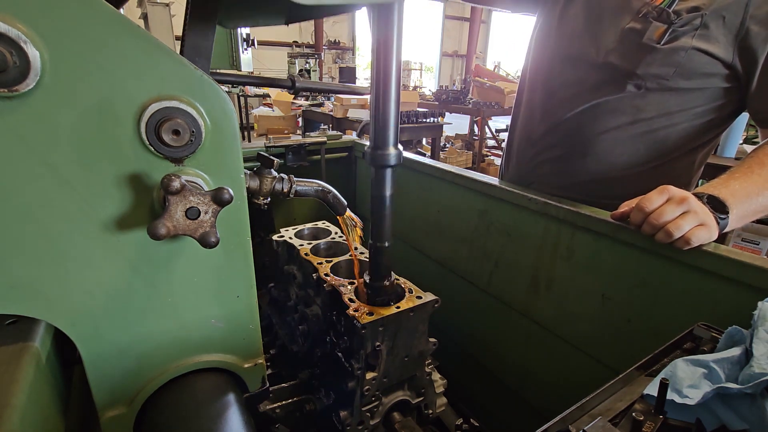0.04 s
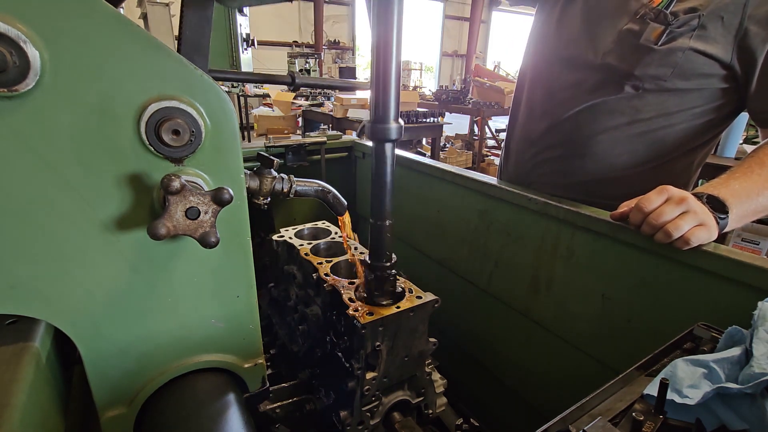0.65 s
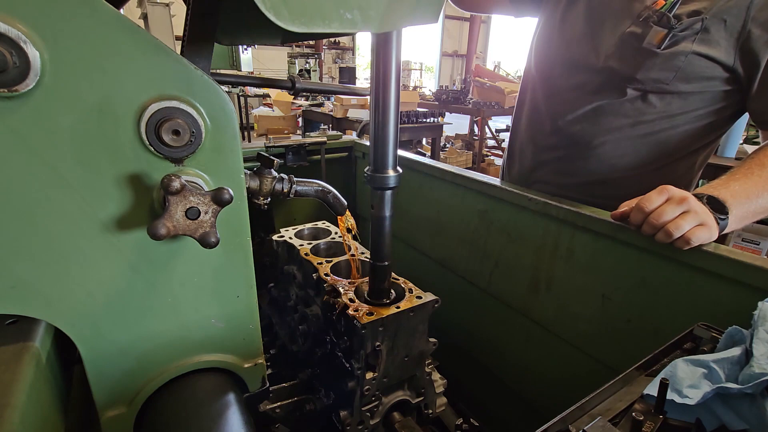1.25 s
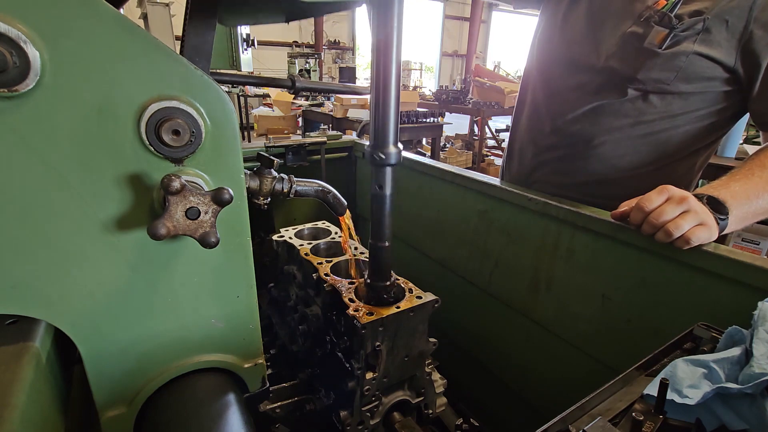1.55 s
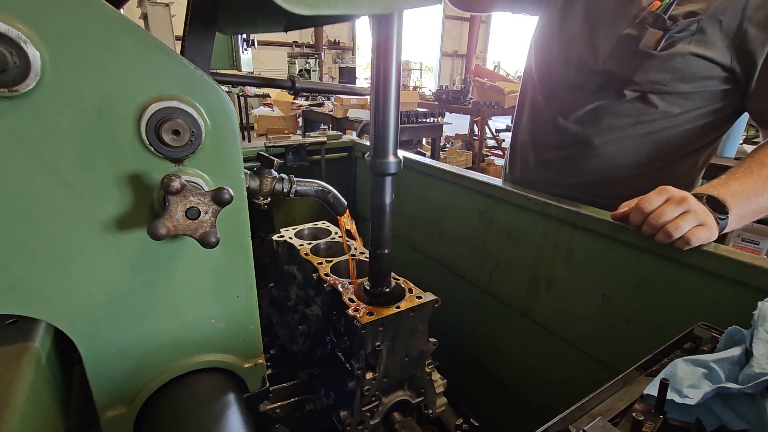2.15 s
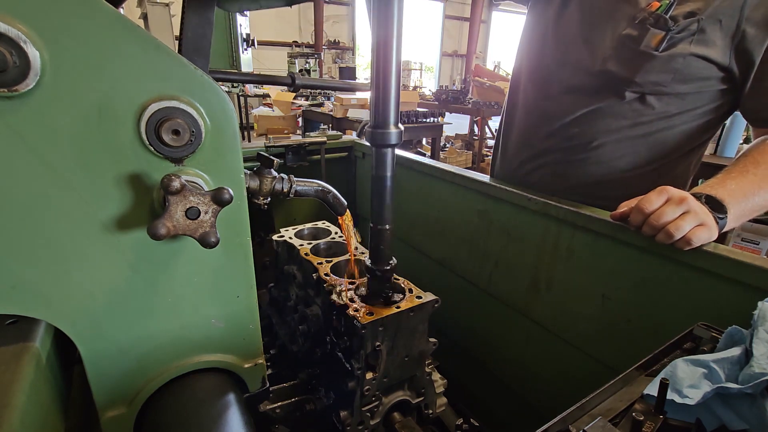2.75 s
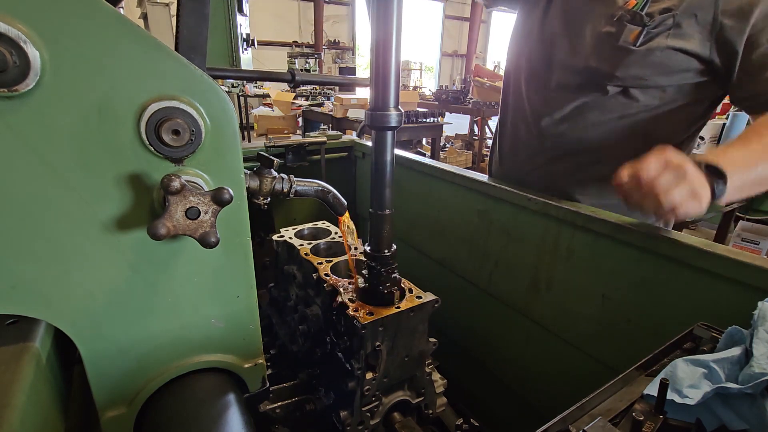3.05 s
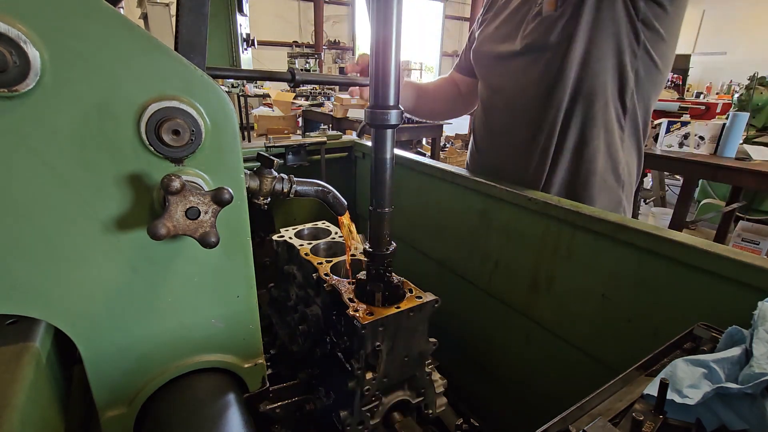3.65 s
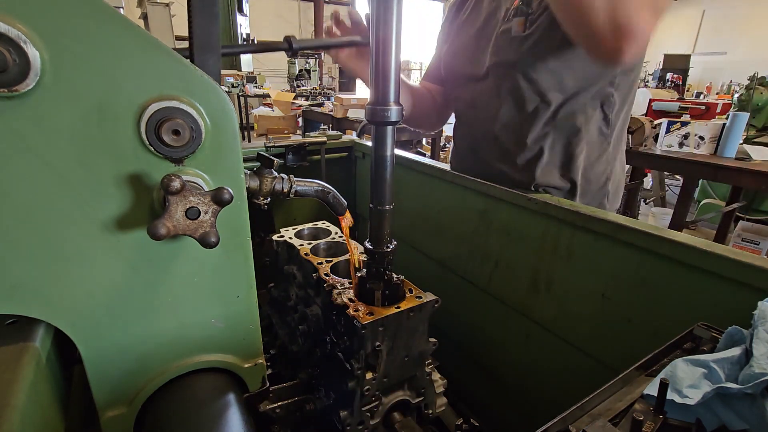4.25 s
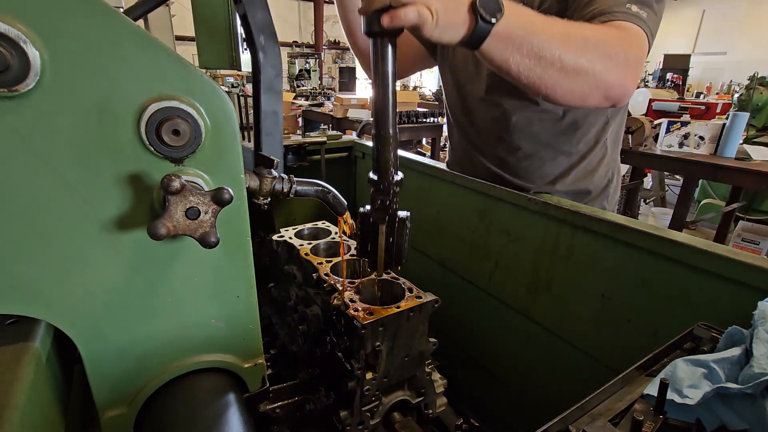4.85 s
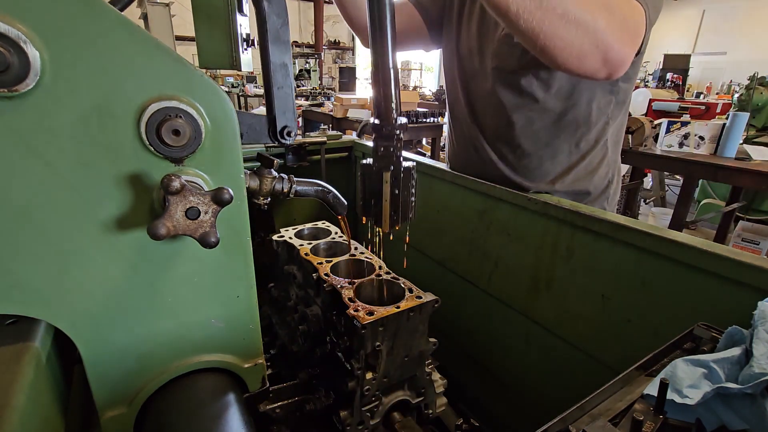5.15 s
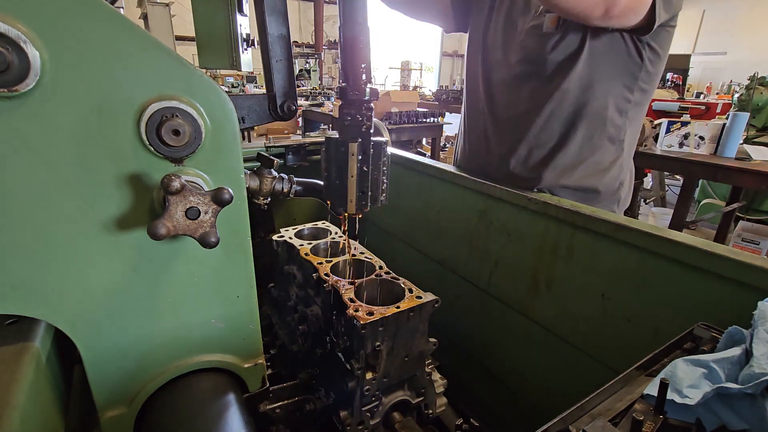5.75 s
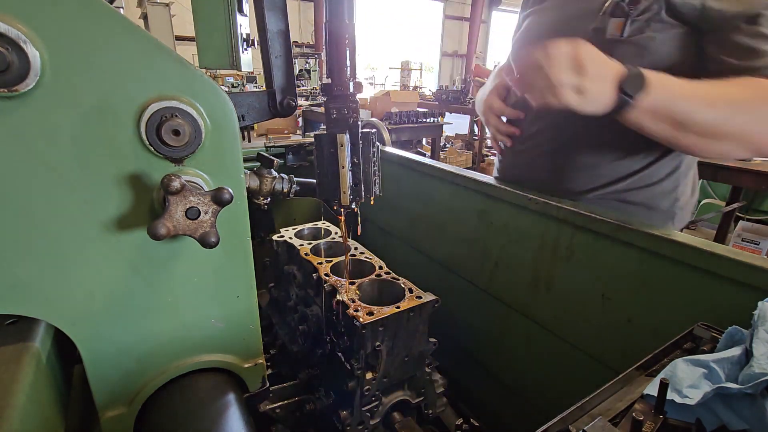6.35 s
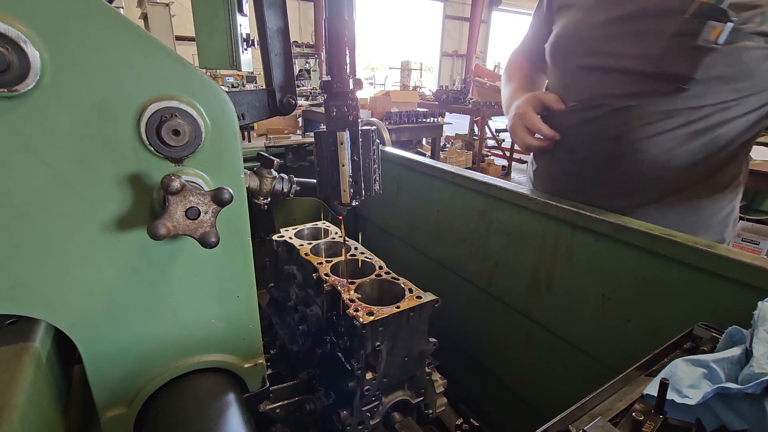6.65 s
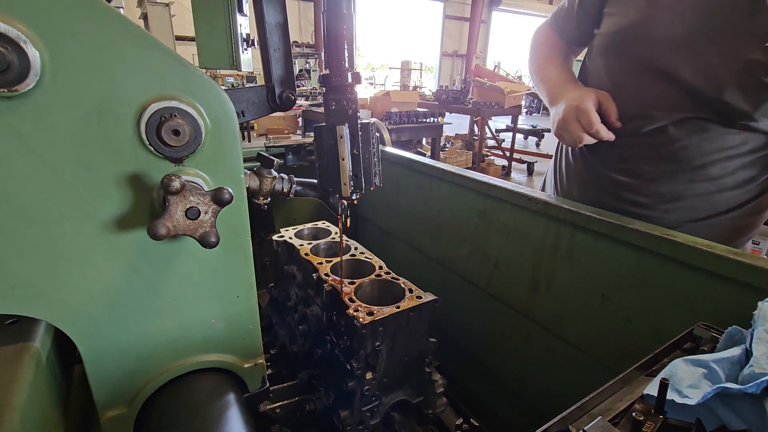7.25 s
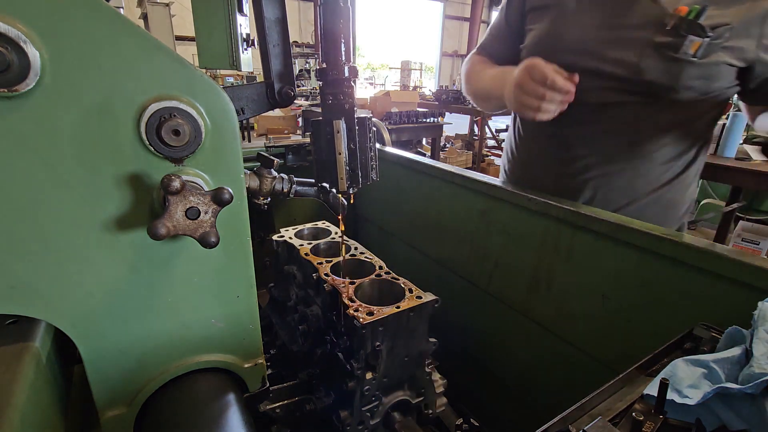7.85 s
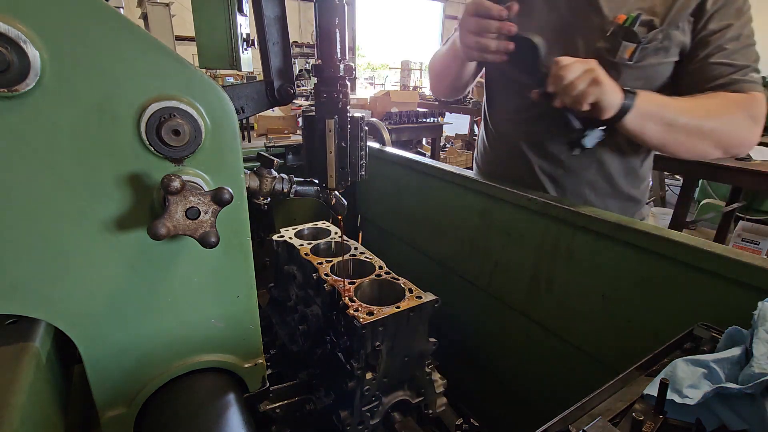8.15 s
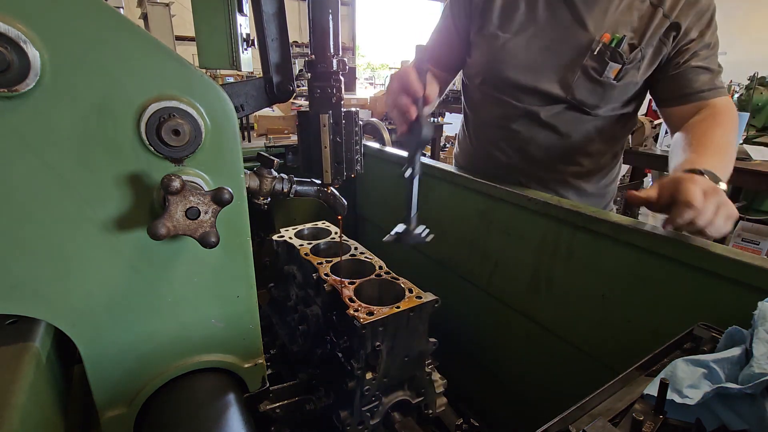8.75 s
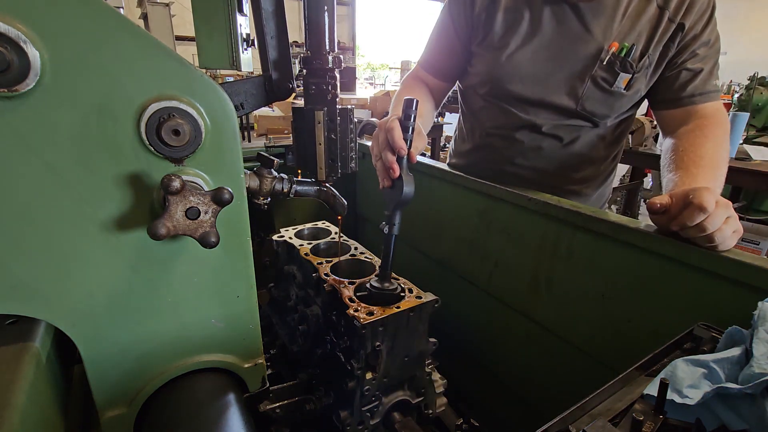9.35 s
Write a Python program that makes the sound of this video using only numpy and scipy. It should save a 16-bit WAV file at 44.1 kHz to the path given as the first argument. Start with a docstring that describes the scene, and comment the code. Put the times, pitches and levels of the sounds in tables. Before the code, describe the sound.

A honing machine drones and scrapes in an engine bore, stops with a clack and brief squeal, then oil drips faintly.

```python
"""A machine shop, a stereo pair close to a honing machine, the low hum of other machines further off.
Stones scrape through an oiled engine bore over the drone of motor and gears; a feed pawl clicks twice
a stroke. The stones are eased off, the drive is thrown out with a clack and a short brake squeal, and
the head is swung up and latched, thudding through the frame. Then oil drips into the tray and tools
are handled, with a short echo from the shop."""
import sys
import numpy as np
from scipy import signal
from scipy.fft import rfft, irfft, next_fast_len
from scipy.io import wavfile
from scipy.ndimage import uniform_filter1d

SR = 44100
rng = np.random.default_rng(int(sys.argv[2]) if len(sys.argv) > 2 else 0)


def pcm_store(signal):
    """Save signal as 16-bit PCM."""
    levels = np.round(np.clip(np.atleast_2d(signal), -1, 1) * 32767)
    wavfile.write(sys.argv[1], SR, levels.astype(np.int16).T)


N = 422919
T, HZ = np.arange(N) / SR, np.fft.rfftfreq(N, 1 / SR)
AGE = T[:SR // 2]  # seconds since a strike

# stereo width at the microphones: f/Hz, side minus mid/dB
STEREO_WIDTH = [(60, -19), (140, -23), (260, -9.5), (500, -6.5), (1000, -.5), (16000, 1)]
# decay of the shop's echo: f/Hz, t60/s
SHOP_DECAY = [(150, 0.51), (600, 0.37), (2000, 0.29), (6000, 0.35), (15000, 0.21)]
# spectrum of the room air: f/Hz, relative level/dB
AIR_SPECTRUM = [(25, -8), (64, -4.5), (130, -4.5), (235, -11), (400, -15.5), (560, -19), (1060, -29),
                (2000, -35), (4700, -37.5), (8000, -40.5), (10000, -49), (15800, -42)]
# hum of distant machines: f/Hz, width/Hz, level/dB
DISTANT_HUM = [(78, 14, -47.5), (120, 1.5, -47), (138.3, 4, -48.5), (195.8, 7.3, -57)]
# swells of a soft, hollow rush: t/s, length/s, level/dB
RUSH_SWELLS = [(7.9, .55, -50.5), (8.95, 0.8, -58)]
# resonances of that rush: f/Hz, width/Hz, relative level/dB
RUSH_MODES = [(666, 170, -0.5), (3000, 1700, -13.5)]
# large drops of oil: t/s, level/dB, f/Hz
OIL_DROPS = [(5.5065, -48, 3050), (5.6521, -46, 1450), (5.8621, -49, 1700), (5.9249, -47, 3360),
             (6.2354, -45, 4480), (6.891, -45, 1800), (7.089, -47, 1460), (7.1501, -46, 2350),
             (7.442, -47.5, 3340), (7.7453, -44, 1820), (8.264, -43.5, 4660), (8.39, -44, 5450),
             (8.422, -42, 5960), (8.519, -43, 7370), (8.711, -48, 2300), (8.862, -46, 7360),
             (9.263, -45, 5700)]
# clicks of handwheel, levers and tools: t/s, level/dB, f/Hz
METAL_CLICKS = [(3.275, -32, 9000), (3.89, -30.5, 11000), (3.958, -34, 8000), (4.048, -28, 5200),
                (4.146, -29, 8500), (4.388, -27.5, 4900), (4.44, -31.5, 11000), (4.645, -31, 7000),
                (4.803, -33.5, 4500), (4.89, -36.5, 6100), (5.236, -36, 7040), (5.376, -37.5, 8000),
                (6.345, -37, 13000), (6.435, -34, 5840), (6.517, -34.5, 6600), (8.117, -44, 9000),
                (9.478, -35, 6000), (9.533, -36, 6400)]
# ring of a steel tool: f/Hz, relative level/dB, t60/s
TOOL_MODES = [(1911, -9, .1), (4350, -6, .12), (9030, 1, .08), (10000, -5, .1)]
# blows on levers and frame: t/s, level/dB, f/Hz, spread/octaves, t60/s, relative body level/dB
LEVER_BLOWS = [(4.569, -11.3, 6200, 1.5, 0.1, -4.5), (5.207, -29, 2120, 1.14, 0.082, 0),
               (5.2844, -11, 2700, 1.12, 0.049, -4.5), (6.016, -24.5, 424, 0.36, 0.083, -2),
               (6.132, -29.5, 330, 0.56, 0.099, -5), (8.367, -24.5, 330, .7, 0.06, -9)]
# ring of the frame: f/Hz, relative level/dB, t60/s
FRAME_MODES = [(257, 0, 0.5), (378, 4, 0.25), (441, -1, 0.18), (584, -5, 0.14), (708, -6, 0.12),
               (1416, 3.5, 0.13), (3400, -7, 0.16)]
# shoves that set the frame shuddering: t/s, length/s, level/dB
FRAME_SHOVES = [(4.567, .09, -21), (4.737, .06, -30.5), (4.907, 0.074, -33), (5.1, 0.43, -41.5),
                (8.38, .19, -38)]
# hum of motor and gears at full speed: multiple of the shaft rate, level/dB
SHAFT_HARMONICS = [(1, -52), (2, -40), (3, -30), (4, -38), (5, -22), (7, -49), (8, -34.5), (9, -45.5),
                   (10, -34), (11, -57), (12, -45.5), (15, -37.5), (16, -41), (19, -46.5), (20, -49.5),
                   (26, -45), (27, -42.5), (34, -48), (35, -44), (43, -49.5), (45, -49.5)]
# spectrum of the gear train's rattle: f/Hz, relative level/dB
GEAR_SPECTRUM = [(25, -28), (45, -15), (150, -14.5), (190, -13), (290, -13), (400, -20), (640, -19.5),
                 (930, -23), (1770, -28), (3000, -29.5), (7500, -40.5), (9000, -45.5), (15500, -50.5)]
# resonances of the gear case: f/Hz, width/Hz, relative level/dB
CASING_MODES = [(240, 23, -36.5), (800, 39, -41.5), (1027, 71, -44.5), (1254, 76, -47.5), (1474, 51, -45)]
# ring of the pawl: f/Hz, relative level/dB, t60/s
PAWL_MODES = [(3250, -16, .07), (4400, -6, .07), (4490, -2, .08), (4640, 0, .1), (10734, -9, .2)]
# faint singing of the stones: t/s, length/s, f/Hz, level/dB
SINGING_SPELLS = [(0, 2.4, 3250, -45), (.55, 2.2, 3730, -50.5), (2.7, 0.33, 3755, -45.5)]
# spectrum of grit scraping iron: f/Hz, relative level/dB
GRIT_SPECTRUM = [(35, -30), (110, -12.5), (300, -18.5), (420, -17.5), (750, -23.5), (1160, -27),
                 (2300, -30.5), (5200, -29.5), (8000, -33), (9500, -36), (11600, -35.5), (15800, -38.5)]
# bore and hone ringing under the stones: f/Hz, width/Hz, relative level/dB
BORE_MODES = [(81.6, 3.5, -43), (145, 22, -36.5), (175, 4, -54), (189, 3.8, -35), (217.7, 7, -37.5),
              (250, 24, -33.5), (288, 27, -41), (365, 2, -46), (451.5, 11, -43), (4490, 22, -50)]

STROKE_STARTS_S = 0.2086 + 1.02705 * np.arange(3)
LIFT_S = 4.85  # the head leaves the bore


def amp(db):
    """Decibels to amplitude."""
    return 10 ** (np.asarray(db) / 20)


def unit(x):
    """Scales to an rms of 1."""
    return x / np.sqrt(np.mean(x ** 2) + 1e-20)


def curve(points, hz):
    """Values at hz, the points joined by straight lines on a log-frequency axis."""
    f, value = np.transpose(points)
    return np.interp(np.log(hz + 1), np.log(f + 1), value)


def side_gain(hz):
    """Side relative to mid: bass is alike at both microphones, treble diffuse."""
    return amp(curve(STEREO_WIDTH, hz))


def since(s):
    """Seconds gone by since time s; zero before it."""
    return np.maximum(T - s, 0)


def swell(start, length, rise_s, fade_db_per_s):
    """An envelope that rises, holds until start + length, and dies away."""
    return np.minimum(since(start) / rise_s, 1) * amp(-fade_db_per_s * since(start + length))


def add(mix, s, sound, pan_db=0):
    """Lays a sound into the mix at time s; pan_db is left minus right."""
    part = mix[:, max(round(s * SR), 0):][:, :sound.shape[-1]]
    part += (sound * amp([[pan_db / 2], [-pan_db / 2]]))[:, :part.shape[1]]


def drift(hz):
    """A random wander of rms 1, up to about hz."""
    rolloff = np.sqrt(1 + (np.arange(2049) / T[-1] / hz) ** 4)
    slow = irfft(rfft(rng.standard_normal(4096)) / rolloff)
    return np.interp(T, np.linspace(0, T[-1], len(slow)), unit(slow))


def noise(colour):
    """Stereo noise with the given amplitude spectrum and a mid rms of 1."""
    size = next_fast_len(N, True)
    hz = np.fft.rfftfreq(size, 1 / SR)
    z = rng.standard_normal((2, len(hz), 2)).view(complex)[..., 0] * np.interp(hz, HZ, colour)
    mid, side = irfft(z[0], size)[:N], irfft(z[1] * side_gain(hz), size)[:N]
    return np.array([mid + side, mid - side]) / np.std(mid)


def patchy(x, depth_db):
    """Gives x short, random swells of level in scattered bands."""
    z = signal.stft(x, nperseg=256)[2]
    field = uniform_filter1d(rng.standard_normal(z.shape[1:]), 14, axis=1)  # smooth over time
    field = uniform_filter1d(field, 6, axis=0)  # and over frequency
    return signal.istft(z * unit(amp(depth_db * unit(field))), nperseg=256)[1][:, :N]


def resonances(modes):
    """Modes (f/Hz, width/Hz, level/dB) kept ringing by random forces."""
    power = sum(amp(db) ** 2 * unit(1 / (1 + ((HZ - hz) / width) ** 2)) ** 2 for hz, width, db in modes)
    return noise(np.sqrt(power)) * np.sqrt(power.mean())


def ring(modes):
    """Struck modes, reaching the two microphones in different phases; the peak is 1."""
    out = 0
    for hz, db, t60 in modes:
        phase = np.array([[1], [-1]]) * side_gain(hz) * rng.uniform(-1.23, 1)
        out += amp(db - 60 * AGE / t60) * np.sin(2 * np.pi * hz * AGE + phase)
    return out / abs(out).max()


def crack(hz, octaves, t60):
    """The dense, fast-dying modes of a contact, gathered around hz."""
    f = np.fft.rfftfreq(len(AGE), 1 / SR) + 1
    band = 1 / (1 + (np.log2(f / hz) / octaves) ** 2 / 2) ** 2 / np.sqrt(f + hz)
    z = rfft(rng.standard_normal((2, len(AGE)))) * band
    mid, side = irfft(z[0], len(AGE)), irfft(z[1] * side_gain(f), len(AGE))
    envelope = amp(-60 * AGE / t60) * (1 - np.exp(-AGE / 0.00074))
    return 0.64 * np.array([mid + side, mid - side]) / np.std(mid) * envelope


def room(x, tail_db):
    """Adds sparse reflections of the shop, each band dying at its own speed."""
    taps = rng.choice([-1., 1.], (2, SR)) * (rng.random((2, SR)) < .06) * (T[:SR] > .004)
    hz, t, z = signal.stft(taps, SR, nperseg=256)
    tail = signal.istft(z * amp(-60 * t / curve(SHOP_DECAY, hz)[:, None]), SR, nperseg=256)[1]
    return x + amp(tail_db) * signal.oaconvolve(x, tail / np.linalg.norm(tail[0]), axes=1)[:, :N]


def shop(air_db=-44.5, whine_hz=374, whine_db=-56.5):
    """Steady room air, the hum of distant machines, and a soft rush that comes and goes."""
    air = amp(air_db) * noise(amp(curve(AIR_SPECTRUM, HZ)))
    whine = np.sqrt(2) * amp(whine_db) * np.sin(2 * np.pi * whine_hz * T + drift(5))
    rush = sum(amp(db) * swell(s, length, rise_s=.12, fade_db_per_s=70) for s, length, db in RUSH_SWELLS)
    return air + whine + resonances(DISTANT_HUM) + rush * resonances(RUSH_MODES)


def spray(start_s=3.1, rise_s=.42, drain_s=.47, level_db=-50.5, band_specks_per_s=20):
    """Specks of oil tick on the metal as the hone comes up the bore, ever fainter as the head drains."""
    out = np.zeros((2, N))
    for hz in (7300, 11000, 15000):
        specks = (rng.random(N) < band_specks_per_s / SR) * amp(12 * rng.random(N) ** 2)
        out += signal.oaconvolve(specks[None], crack(hz, octaves=.25, t60=.034), axes=1)[:, :N]
    flow = np.minimum(since(start_s) / rise_s, 1) / (1 + since(LIFT_S) / drain_s) ** .85
    return room(amp(level_db) * flow * unit(out), tail_db=-.5)


def drop(hz):
    """A small bubble rings with rising pitch under a soft splat."""
    bubble = np.sin(2 * np.pi * hz * AGE * (1 + .89 * AGE))
    envelope = amp(-60 * AGE / .05) * (1 - np.exp(-AGE / .0012))
    return bubble * envelope + amp(-2) * crack(hz, octaves=.35, t60=.065)


def oil(small_db=-56, scatter_s=.08, bursts=40):
    """Oil drips off the raised head: large drops that splash, and small ones in bursts of four."""
    out = np.zeros((2, N))
    for s, db, hz in OIL_DROPS:
        add(out, s, amp(db) * (drop(hz) + amp(-5) * crack(3600, octaves=.64, t60=.08)))
    for k, burst in enumerate(rng.random((bursts, 4, 4))):
        s = LIFT_S + (k + rng.random()) / bursts * (T[-1] - LIFT_S)
        for lag, size, pitch, place in burst:
            droplet = amp(small_db + 6 * size ** 2) * drop(1700 * 4 ** pitch)
            add(out, s + scatter_s * lag, droplet, pan_db=8 * (place - .5))
    return room(out, tail_db=-1.5)


def handling(clink_s=7.537, clink_db=-37):
    """Metal parts click lightly, and a steel tool clinks once, left of the microphones."""
    out = np.zeros((2, N))
    for s, db, hz in METAL_CLICKS:
        add(out, s, amp(db) * crack(hz, octaves=.68, t60=.088))
    add(out, clink_s, amp(clink_db) * ring(TOOL_MODES), pan_db=9.4)
    return room(out, tail_db=-6.5)


def brake(peak_s=4.74, peak_hz=925, peak_db=-26, grow_db_per_s=125, fade_db_per_s=353):
    """The brake's rough squeal grows, rises a little and breaks off, with a second tone just below."""
    before = np.maximum(peak_s - T, 0)
    hz = (peak_hz - 350 * before) * (1 + .0222 * drift(55))
    angle = 2 * np.pi * np.cumsum(hz) / SR
    squeal = np.array([np.sin(angle + lag) + .35 * np.sin(.91 * angle - lag) for lag in (0, 1)])
    envelope = amp(peak_db - grow_db_per_s * before - fade_db_per_s * since(peak_s))
    return squeal * envelope * (1 + .56 * drift(50))


def frame(thud_db=-5, thud_hz=480, sway_hz=80):
    """Levers strike the frame, which thuds and rings; shoves make it shudder on its lowest modes."""
    out = np.zeros((2, N))
    for s, db, hz, octaves, t60, body_db in LEVER_BLOWS:
        # a soft blow barely excites the high modes
        modes = [(f, level - 10 * np.log10(1 + (f / (2 * hz)) ** 4), decay)
                 for f, level, decay in FRAME_MODES]
        body = .5 * ring(modes) + amp(thud_db) * crack(min(hz, thud_hz), octaves=.87, t60=.19)
        add(out, s, amp(db) * (crack(hz, octaves, t60) + amp(body_db) * body), pan_db=-1)
    shudder = sum(amp(db) * swell(s, length, rise_s=.058, fade_db_per_s=122)
                  for s, length, db in FRAME_SHOVES)
    sway = np.sqrt(2) * np.sin(2 * np.pi * np.cumsum(sway_hz + 5 * drift(10.8)) / SR)
    return room(out, tail_db=-12) + shudder * (sway + resonances([(130, 50, -6.5), (251, 38, -7.5)]))


def drive(shaft_hz=29.77, stop_s=4.56, coast_s=.68):
    """Motor and gears hum and rattle in time with the shaft; thrown out, they slow evenly to rest."""
    speed = np.maximum(1 - since(stop_s) / coast_s, 0)
    angle = 2 * np.pi * np.cumsum(shaft_hz * speed) / SR + .0085 * drift(4.3)
    hum = np.zeros((2, N))
    for order, db in SHAFT_HARMONICS:
        phase, side_phase = rng.uniform(0, 2 * np.pi, 2)
        mid = np.cos(order * angle + phase)
        side = side_gain(order * shaft_hz) * np.cos(order * angle + phase + side_phase)
        waver = 1 + .084 * drift(5.4)
        hum += np.sqrt(2) * amp(db) * waver * np.array([mid + side, mid - side])
    rattle = amp(-32) * noise(amp(curve(GEAR_SPECTRUM, HZ))) + amp(-1) * resonances(CASING_MODES)
    throb = unit(1 + .087 * np.cos(angle) + .25 * np.cos(6 * angle) + .15 * drift(60))
    return hum * speed ** 5.2 + rattle * throb * speed ** 2.5


def pawl(gain_db=-9, gap_s=.043, bounce_s=.0072, pan_db=-2.5):
    """Right of centre, the pawl drops twice onto its ratchet as each stroke opens, bounces and rings."""
    out = np.zeros((2, N))
    for stroke in STROKE_STARTS_S:
        for s, db in (stroke, 0), (stroke + gap_s, -.6):
            click = amp(-1) * ring(PAWL_MODES) + amp(-8) * crack(2450, octaves=1.8, t60=.1)
            add(out, s, amp(db) * click, pan_db)
            add(out, s + bounce_s, amp(db - 6) * crack(4580, octaves=.037, t60=.059), pan_db)
    return room(amp(gain_db) * out, tail_db=-16)


def singing(width_hz=40):
    """Friction keeps narrow modes of the hone ringing for a while."""
    return sum(swell(s, length, rise_s=.08, fade_db_per_s=60) * resonances([(hz, width_hz, db)])
               for s, length, hz, db in SINGING_SPELLS)


def stones(ease_s=2.57, release_s=3.05, release_db_per_s=37, swish_every_s=.1255, turn_after_s=.403):
    """Grit pressed against the bore scrapes, sizzles and sets the iron ringing until it is let off."""
    # the scrape sinks as the stones near the end of the bore
    slowing = sum(np.exp(-((T - s - .3) / .09) ** 2) for s in STROKE_STARTS_S)
    eased = np.minimum(since(ease_s) / .18, 1)
    pressure = amp(-36.5 - 1.5 * slowing - 3 * eased - release_db_per_s * since(release_s))
    grains = unit(amp(.62 * drift(60)))
    grit = patchy(noise(amp(curve(GRIT_SPECTRUM, HZ))), depth_db=2) * grains
    # the sizzle swells each time a stone comes round
    surge_db = 4 * np.cos(2 * np.pi * (T - .0925) / swish_every_s) + 4 * np.tanh(drift(4))
    sizzle = sum(resonances([(hz, 250, 0)]) * unit(amp(surge_db + 6 * np.tanh(drift(14))))
                 for hz in (5950, 6550))
    out = pressure * (amp(7.5) * grit + amp(-11) * sizzle + amp(37) * resonances(BORE_MODES))
    # a rasp at each reversal and at the release
    for s in [*(STROKE_STARTS_S + turn_after_s), release_s]:
        add(out, s, amp(-22.5) * crack(2000, octaves=1.8, t60=.19) * (1 - np.exp(-AGE / .0047)))
    return out


def scene():
    """The running machine just left of centre, its clicks, blows and oil, and the shop behind."""
    machine = (drive() + stones() + singing()) * amp([[.45], [-.45]])
    return machine + pawl() + brake() + frame() + handling() + oil() + spray() + shop()


def record(dry):
    """The recorder passes the microphones' signal up to 16.2 kHz."""
    lowpass = signal.firwin(511, 16200, window=("kaiser", 9), fs=SR)
    return signal.oaconvolve(dry, lowpass[None], "same", axes=1)


dry = scene()
out = record(dry)
pcm_store(out)
```